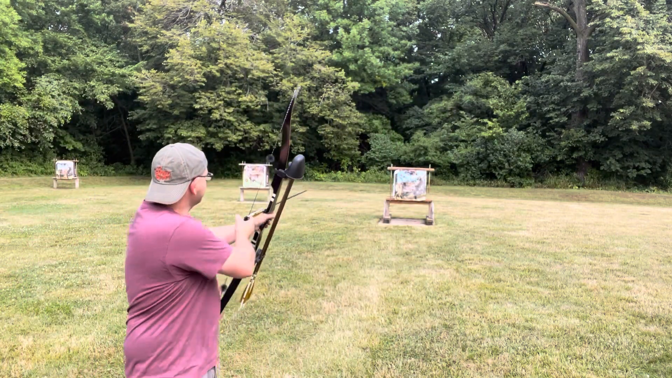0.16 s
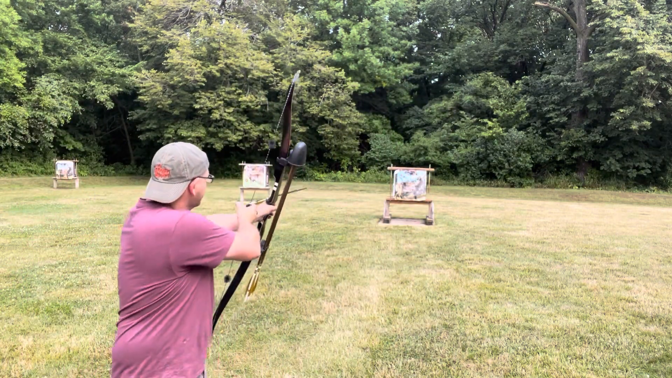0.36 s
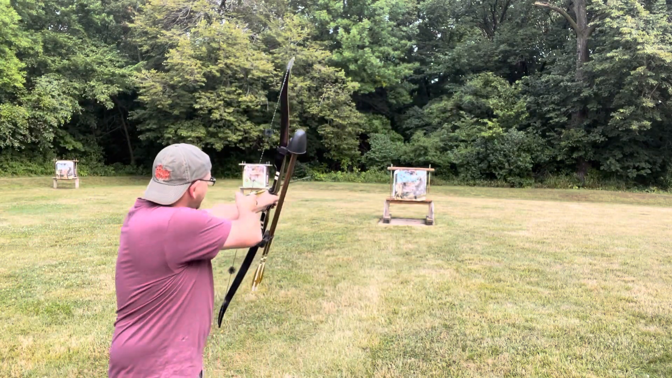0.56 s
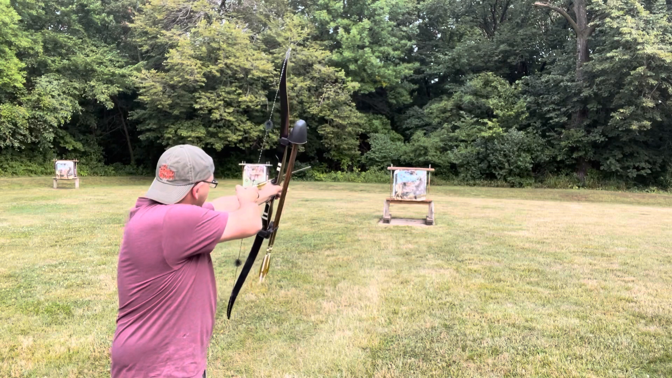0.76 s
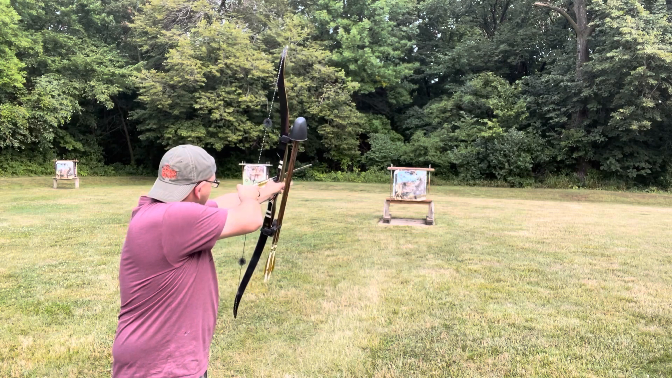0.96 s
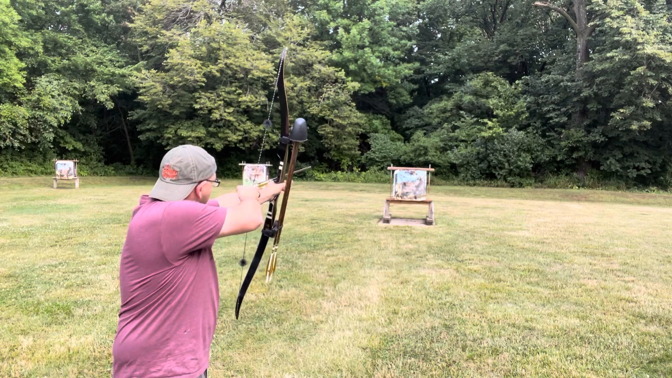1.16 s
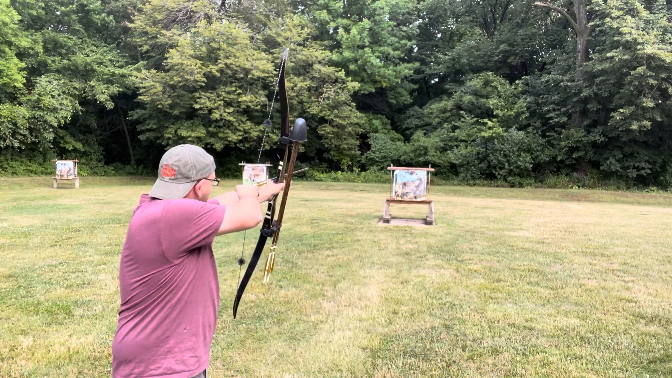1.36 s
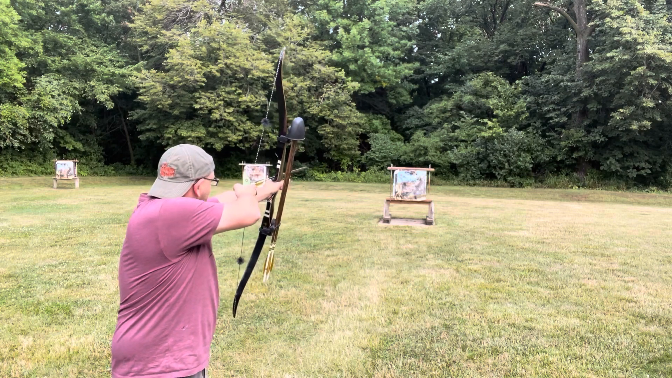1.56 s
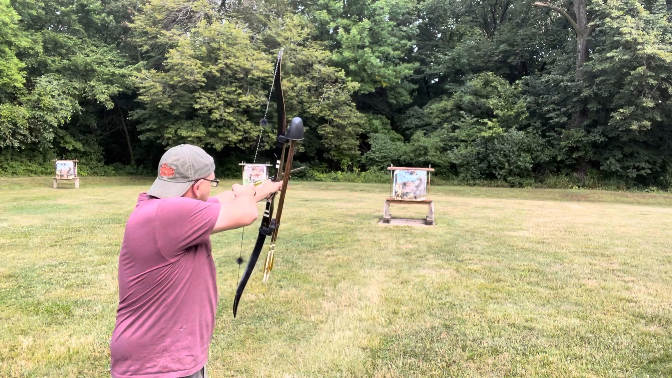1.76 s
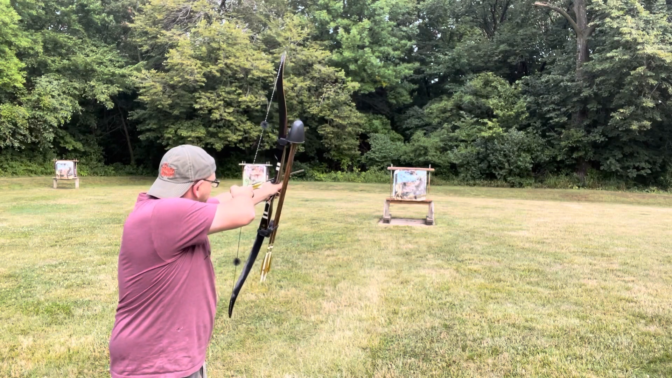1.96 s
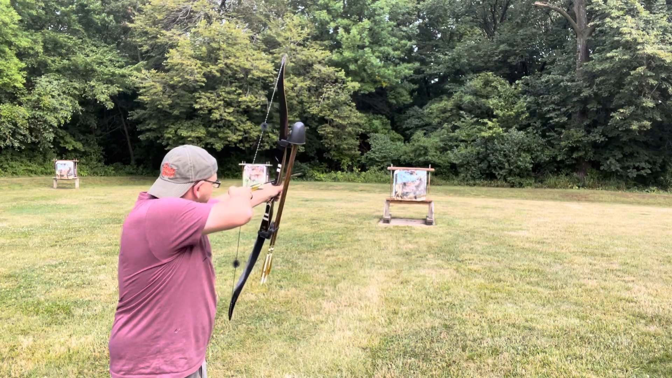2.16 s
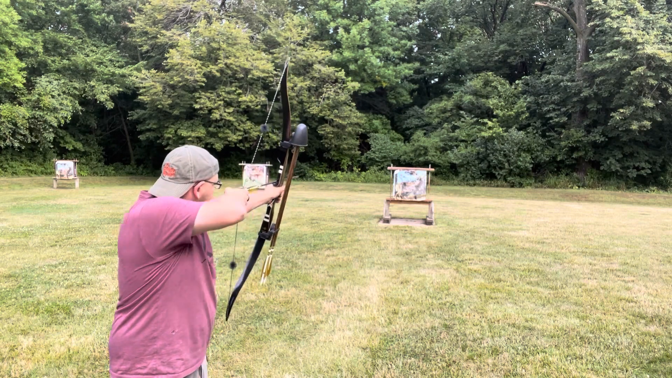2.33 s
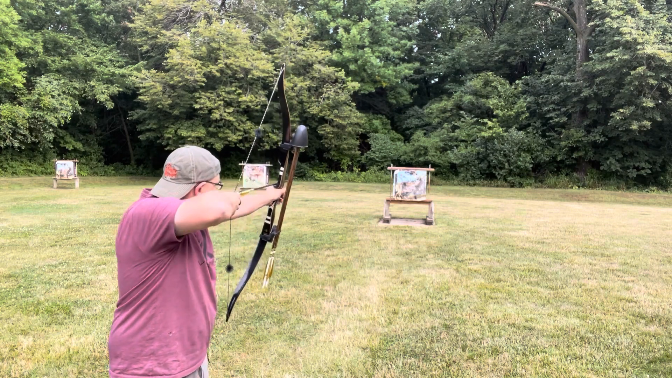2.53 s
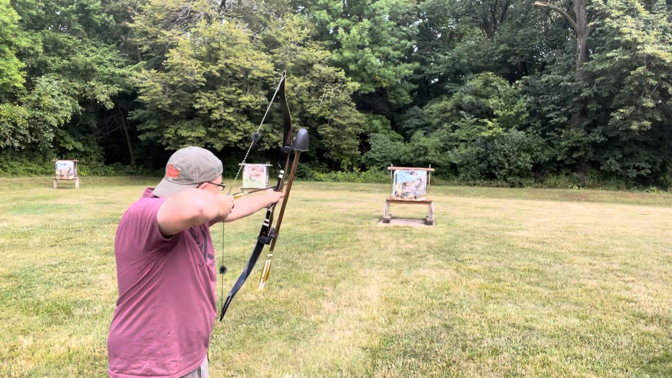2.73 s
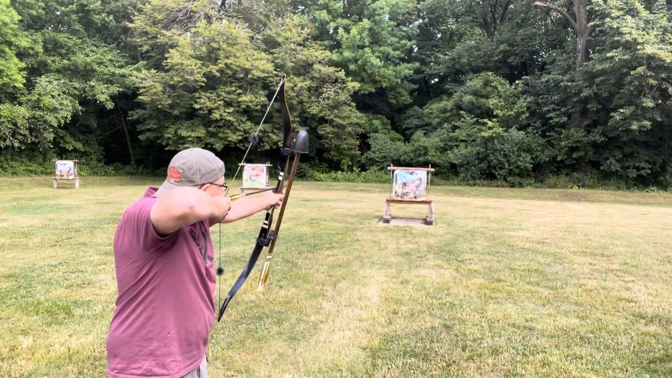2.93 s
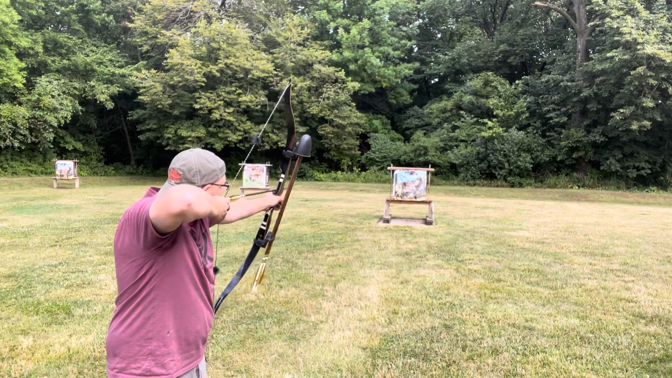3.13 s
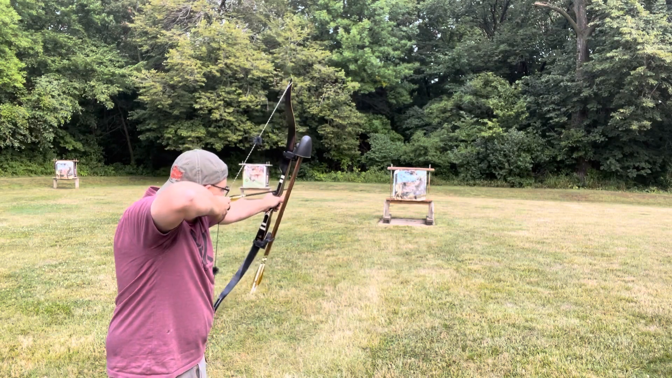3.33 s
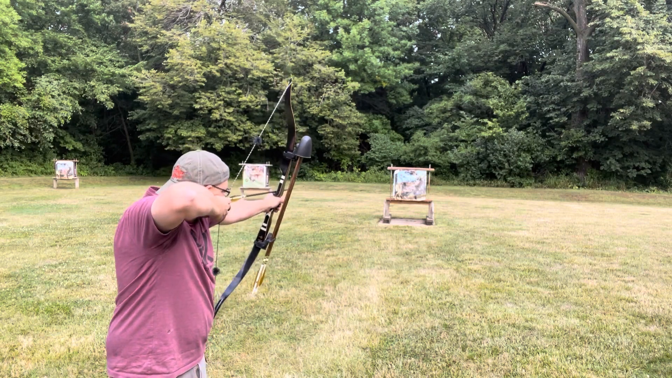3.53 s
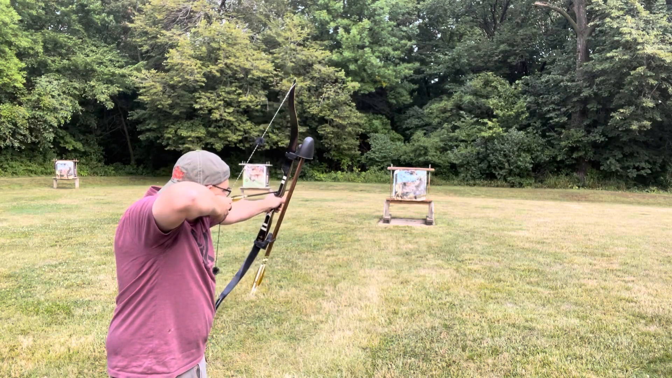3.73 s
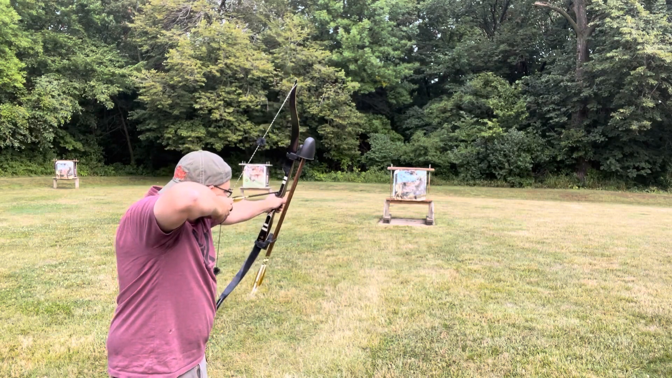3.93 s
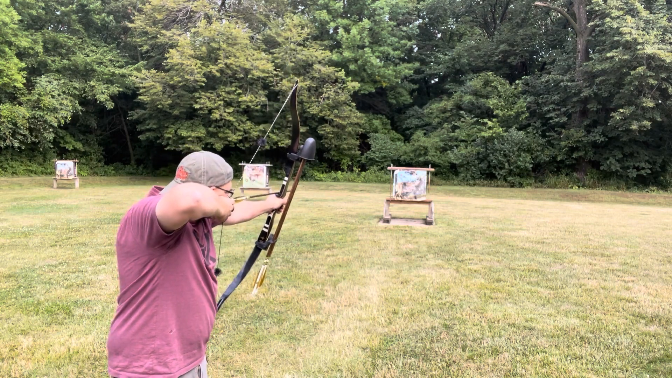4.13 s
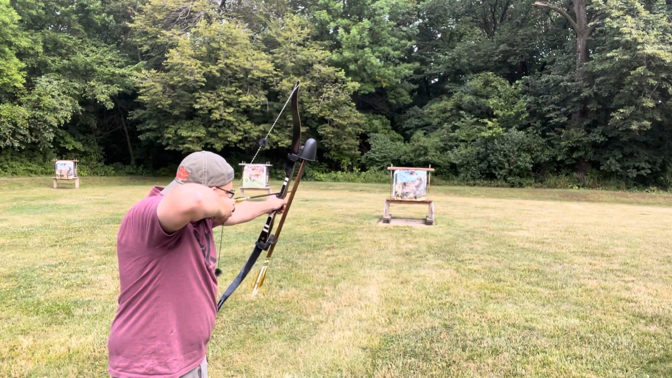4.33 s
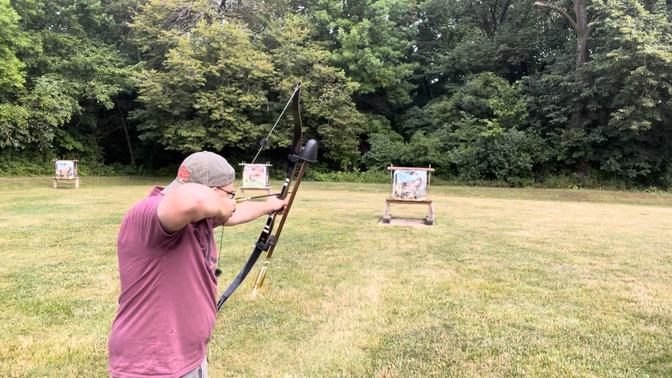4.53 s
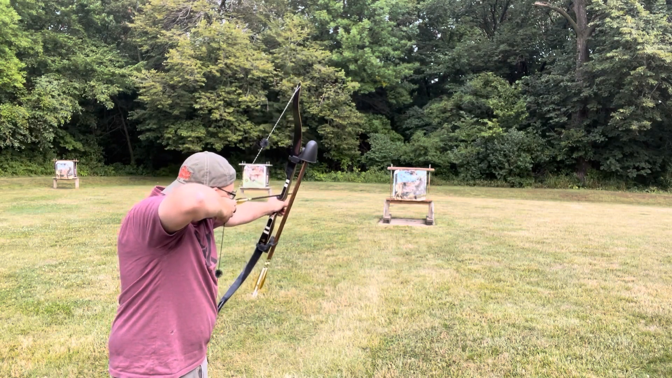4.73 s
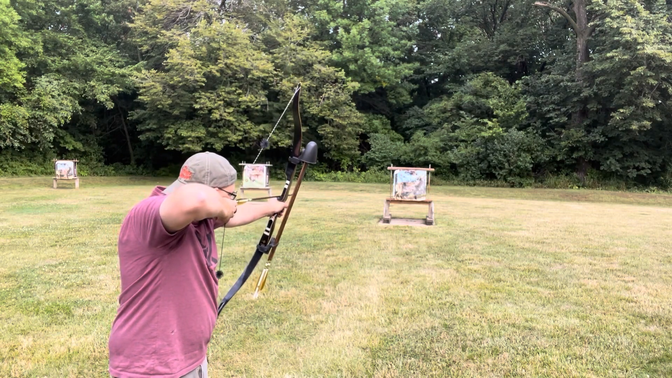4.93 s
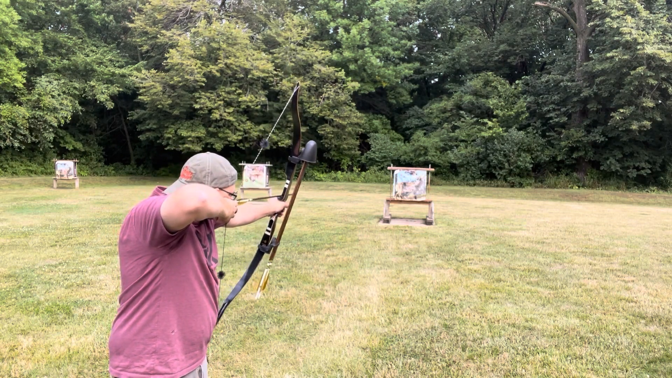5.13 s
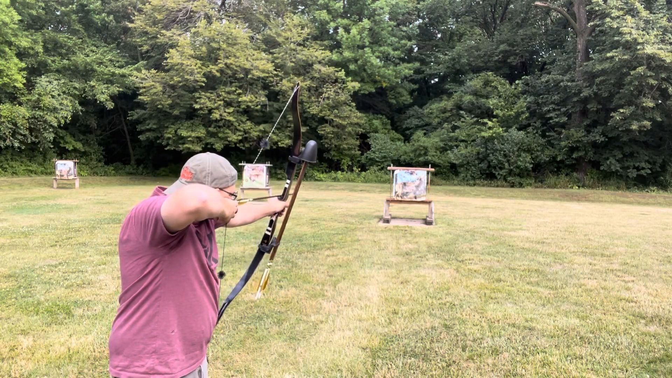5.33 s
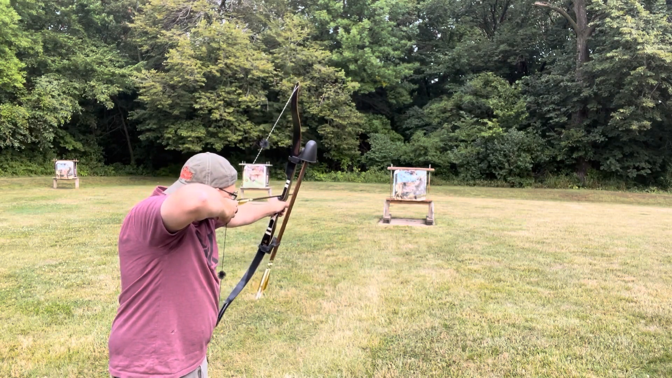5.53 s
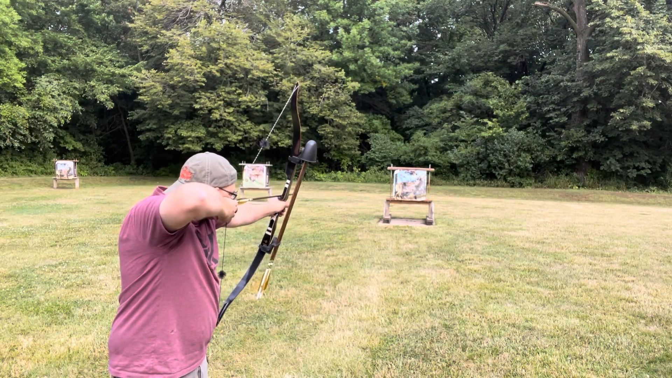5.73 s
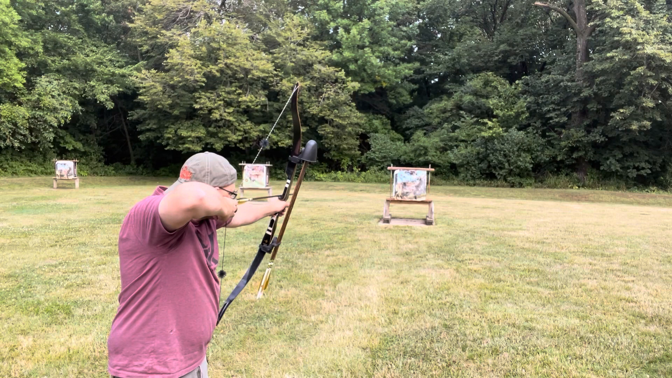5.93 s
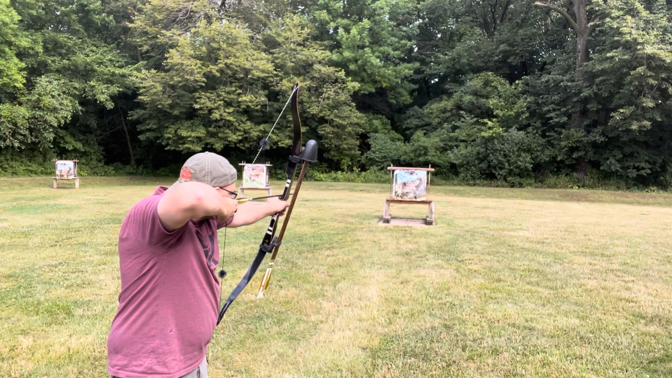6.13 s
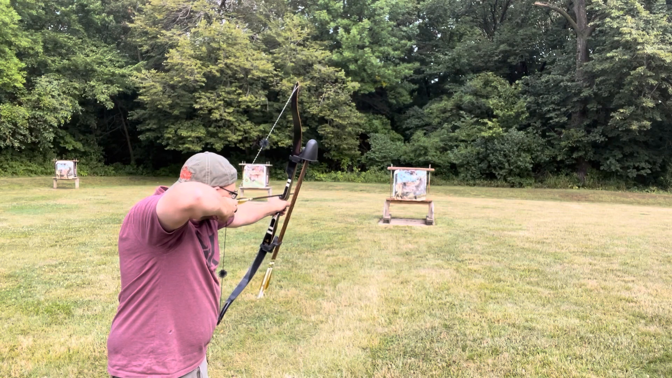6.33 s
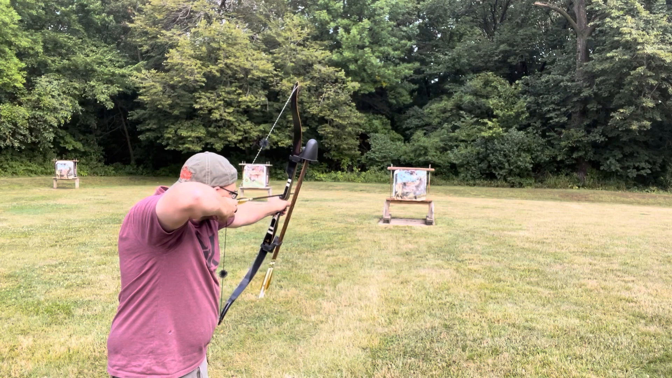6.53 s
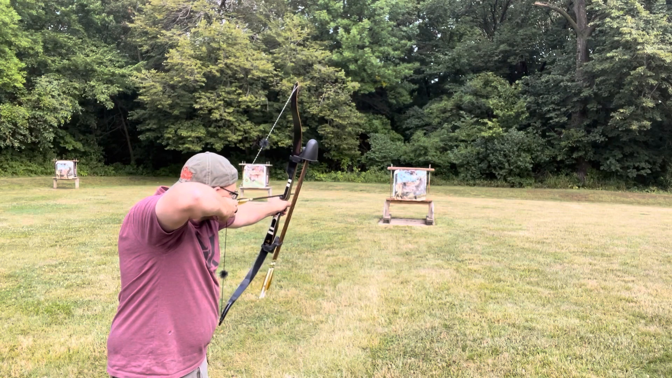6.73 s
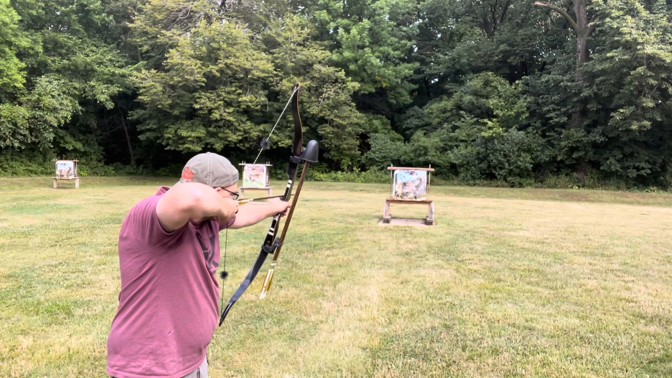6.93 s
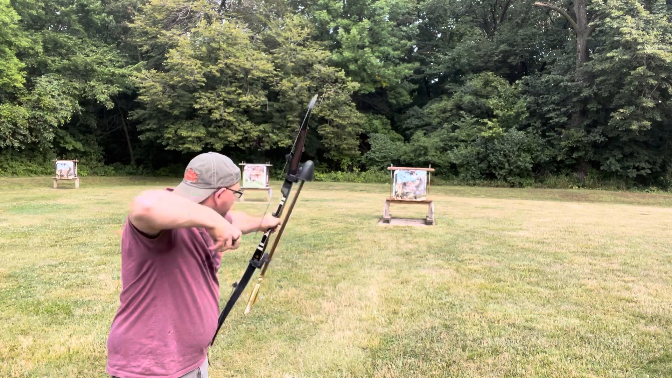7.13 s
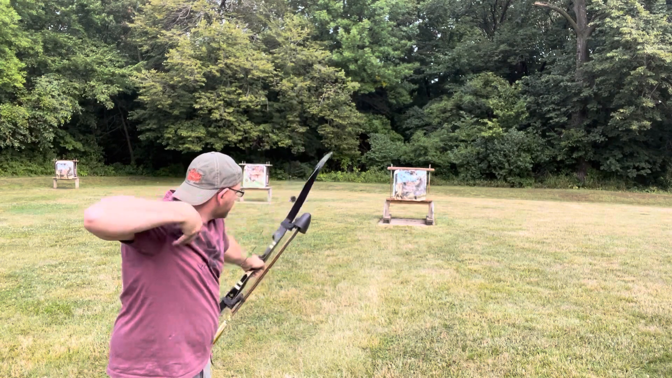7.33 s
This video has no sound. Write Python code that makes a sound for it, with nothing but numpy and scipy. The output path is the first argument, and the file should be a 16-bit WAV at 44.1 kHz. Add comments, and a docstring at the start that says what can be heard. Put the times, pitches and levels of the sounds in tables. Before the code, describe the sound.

Insects shimmer, a near cricket chirps and birds chip on a grassy range until a bowstring cracks loose and an arrow smacks into a target.

```python
"""A grassy archery range at the edge of a wood: insects, a low motor drone, rumble, far traffic and air throughout.
Clothes rustle and birds chip at once; a near cricket, trills, buzzy calls and whistles follow, mostly as sine waves.
The background is louder from 1.75 to 4.2 s. At 4.5 s a far engine whines, then sags in pitch. At 7 s the bowstring
is loosed: noise cracks ring the limbs, a grainy rattle dies away, slow thuds and a blur from the trees follow.
At 7.3 s the arrow smacks into the target: a falling snap, short ringing tones, noise and late pings."""
import sys
import numpy as np
from scipy import signal
from scipy.fft import rfft, irfft
from scipy.io import wavfile

SR = 44100
rng = np.random.default_rng(int(sys.argv[2]) if len(sys.argv) > 2 else 0)


def wrap_up_sound(samples):
    """Save the sound to the file named by the first command line argument, as 16-bit audio."""
    columns = np.atleast_2d(samples).T
    # keep every value between -1 and 1, then stretch to whole-number steps
    tamed = np.clip(columns, -1, 1)
    steps = np.round(tamed * 32767).astype(np.int16)
    wavfile.write(sys.argv[1], SR, steps)


N = 325458
HIT_S = 7.2968   # the arrow meets the target


def amp(db):
    """Gain of a dB value."""
    return 10 ** (np.asarray(db) / 20)


def rms_one(x):
    """Scale to an rms (average strength) of 1."""
    return x / np.sqrt(np.mean(x ** 2) + 1e-20)


def in_time(rows):
    """Columns of a curve, joined by straight lines, at every sample."""
    s, *columns = np.transpose(rows)
    return [np.interp(np.arange(N) / SR, s, c) for c in columns]


def add(out, s, x):
    """Mix x into out from second s."""
    at = round(s * SR)
    out[at:at + len(x)] += x[:N - at]


def drift(rate, size=N):
    """Smooth random wander with rms 1; a higher rate in Hz wanders faster."""
    r = np.exp(-2 * np.pi * rate / SR)
    wander = signal.lfilter([1], [1, -2 * r, r * r], rng.standard_normal(size + SR))
    return rms_one(wander[SR:])   # the first second lets the filter settle


def resonate(x, hz, width):
    """Two-pole resonance with gain 1 on top."""
    r = np.exp(-np.pi * width / SR)
    poles = [1, -2 * r * np.cos(2 * np.pi * hz / SR), r * r]
    return signal.lfilter([(1 - r * r) / 2, 0, (r * r - 1) / 2], poles, x)


def resonate_twice(x, hz, width):
    """The same resonance passed twice, for steeper sides."""
    return resonate(resonate(x, hz, width), hz, width)


def ring(x, hz, t60):
    """A unit click sets a sine ringing from height 1; it falls by 60 dB in t60 seconds."""
    r, w = amp(-60 / (t60 * SR)), 2 * np.pi * hz / SR
    return signal.lfilter([0, np.sin(w)], [1, -2 * r * np.cos(w), r * r], x + 1e-18)


def shaped(spectrum, size=N):
    """Noise with a given spectrum, rms 1."""
    hz, db = np.transpose(spectrum)
    grid = np.log(np.arange(size // 2 + 1) * SR / size + 1)
    gain = amp(np.interp(grid, np.log(hz), db))
    return rms_one(irfft(rfft(rng.standard_normal(size)) * gain, size))


def sine(hz):
    """Sine along a pitch track, rms 1 when steady."""
    return np.sqrt(2) * np.sin(2 * np.pi * np.cumsum(hz) / SR)


def span(length_s):
    """Share of an event gone by, 0 to 1, at every sample."""
    return np.linspace(0, 1, round(length_s * SR))


def hump(u, crest, edge_db, fade_s):
    """Gain that climbs in dB to its crest, sinks again and fades out at both ends."""
    crest = np.clip(crest, .01, .99)
    ends = np.clip(np.minimum(u, 1 - u) * len(u) / SR / fade_s, 0, 1)
    return amp(edge_db * np.maximum(1 - u / crest, (u - crest) / (1 - crest))) * ends


def drone():
    """A far motor: a low sine whose pitch and level waver."""
    # level of the motor before its waver: (t/s, level/dB)
    drone_level = [(0, -63), (.56, -59.5), (1.67, -60.5), (1.88, -56), (3.2, -52), (4.05, -54.5),
                   (4.3, -59.5), (5.3, -56), (6.1, -55), (6.5, -59), (7.38, -54.5)]
    db, = in_time(drone_level)
    return amp(db + 2.6 * drift(2.55)) * sine(87.5 + 3.44 * drift(4.78))


def rumble():
    """Low noise with a slowly changing level and a slight waver."""
    # relative strength of the noise by pitch: (f/Hz, level per Hz/dB)
    rumble_spectrum = [(20, -49), (35, -21), (50, 3), (70, 10), (120, 6), (170, -2.5), (260, -6), (380, -9),
                       (600, -44), (3000, -46), (11000, -42), (13600, -43), (14300, -58)]
    # level before the waver: (t/s, level/dB)
    rumble_level = [(0, -63.5), (1.7, -63), (1.87, -55.5), (2.9, -55.5), (4.1, -57), (4.25, -63.5),
                    (4.9, -63.5), (5.3, -60), (5.8, -61), (7.38, -63)]
    db, = in_time(rumble_level)
    return amp(db + 1.08 * drift(6)) * shaped(rumble_spectrum)


def traffic():
    """Far traffic: noise around the middle pitches, coming and going."""
    # relative strength of the noise by pitch: (f/Hz, level per Hz/dB)
    traffic_spectrum = [(250, -20), (420, 2.5), (550, 2.5), (700, 0.5), (900, -4), (1200, -14.5),
                        (2000, -45), (13600, -52), (14300, -66)]
    # level before the waver: (t/s, level/dB)
    traffic_level = [(0.0, -73.5), (0.37, -71.5), (1.59, -71), (1.8, -62.5), (2.02, -55.5), (2.89, -68.5),
                     (3.92, -68), (4.23, -75), (5.05, -76), (5.26, -69), (5.39, -70.5), (6.15, -77.5),
                     (6.87, -76.5), (6.97, -73.5)]
    db, = in_time(traffic_level)
    return amp(db + 2.2 * drift(5.9)) * shaped(traffic_spectrum)


def louder_stretch():
    """Share, 0 to 1, of a louder stretch from 1.75 to 4.2 s, which lifts the low chorus and the air."""
    t = np.arange(N) / SR
    start_s, end_s, rise_s, fall_s = 1.75, 4.2, .15, .15
    return np.clip(np.minimum((t - start_s) / rise_s, (end_s - t) / fall_s), 0, 1)


def chorus(wings, flicker_db):
    """Countless far insects blur into noise in their wing resonances."""
    bands = []
    for hz, width, db in wings:
        band = rms_one(resonate_twice(rng.standard_normal(N), hz, width))
        bands.append(amp(db + flicker_db * drift(25)) * band)
    return rms_one(sum(bands))


def insects():
    """A low chorus, louder in that stretch, and a high chorus that sings lower at first, then climbs."""
    # wing resonances of the low insects: (f/Hz, width of each pass/Hz, relative level/dB)
    low_wings = [(4820, 340, -3), (5172, 300, 0.5), (5470, 580, 0)]
    # wing resonances of the high insects: (f/Hz, width of each pass/Hz, relative level/dB)
    high_wings = [(6590, 760, -3), (7200, 370, 1.5), (7610, 430, -1.5)]
    # level of the high chorus: (t/s, level/dB)
    high_level = [(0.0, -74.5), (0.7, -81.5), (1.1, -81), (1.92, -72.5), (3.98, -73.5), (4.19, -77),
                  (4.46, -76.5), (5.38, -75), (5.71, -79.5), (6.97, -76.5)]
    low = amp(-71.5 + 2 * louder_stretch()) * chorus(low_wings, flicker_db=0.9)
    early_wings = [(0.98 * hz, width, db) for hz, width, db in high_wings]
    # crossfade from the lower singing to the higher, 1.2 to 1.6 s
    risen = np.interp(np.arange(N) / SR, (1.2, 1.6), [0, np.pi / 2])
    early = np.cos(risen) * chorus(early_wings, flicker_db=3.0)
    late = np.sin(risen) * chorus(high_wings, flicker_db=1.5)
    high_db, = in_time(high_level)
    return low + amp(high_db) * (early + late)


def air():
    """Soft hiss of the open air, louder from 1.75 to 4.2 s, mostly below 11 kHz."""
    # relative strength of the noise by pitch: (f/Hz, level per Hz/dB)
    air_spectrum = [(500, 16), (1500, 10.5), (3000, 6.5), (6000, 12), (8500, -10), (10500, 1), (13500, -19),
                    (14000, -25), (14600, -30), (17000, -46)]
    hiss = shaped(air_spectrum)
    below_11k = signal.sosfilt(signal.butter(2, 11000, fs=SR, output="sos"), hiss)
    hiss = hiss + (amp(2 * louder_stretch()) - 1) * below_11k
    return amp(-80 + 0.82 * drift(1)) * hiss


def rustles():
    """Cloth sliding over cloth: noise in a few body resonances plus a bright swish."""
    # rustles: (t/s, crest t/s, end t/s, body level/dB, swish level/dB, level of the ends below the crest/dB)
    rustle_rows = [(0, .005, .09, -70.5, -75, -12), (.36, .46, .5, -79, -78, -6),
                   (1.746, 1.94, 2.2, -68, -82, -12), (2.177, 2.298, 2.39, -67.5, -87, -12),
                   (2.356, 2.37, 2.53, -69, -73.5, -9), (2.5, 2.6, 2.76, -77.5, -84, -10)]
    # resonances of the cloth: (f/Hz, width of each pass/Hz, relative level/dB)
    cloth = [(1060, 690, 3.5), (1705, 260, 1), (2140, 430, 1), (3700, 1700, 0.5)]
    body = np.zeros(N)
    for hz, width, db in cloth:
        band = rms_one(resonate_twice(rng.standard_normal(N), hz, width))
        body += amp(db + 1.4 * drift(16.0)) * band
    body = rms_one(body)
    swish_band = signal.butter(4, [2500, 11500], "band", fs=SR, output="sos")
    swish = signal.sosfilt(swish_band, rng.standard_normal(N))
    swish = rms_one(swish * amp(1.1 * drift(60)))
    out = np.zeros(N)
    for s, crest_s, end_s, body_db, swish_db, edge_db in rustle_rows:
        at, u = round(s * SR), span(end_s - s)
        part = slice(at, at + len(u))
        cloth_sound = amp(body_db) * body[part] + amp(swish_db) * swish[part]
        add(out, s, hump(u, (crest_s - s) / (end_s - s), edge_db, fade_s=0.0035) * cloth_sound)
    return out


def chips():
    """Short bird chips: gliding sines that rise quickly and die away."""
    # chips: (t/s, level before rise and decay/dB, f/Hz, time to fall 60 dB/s, glide/Hz per ms)
    chip_rows = [(.004, -59, 4430, 0.2, 1.5), (.066, -56, 5600, 0.025, -45), (1.575, -56.5, 7560, 0.12, 6),
                 (1.58, -59, 6580, 0.07, -8), (1.922, -69, 11000, .04, -2), (1.965, -60, 6550, 0.13, 4.5),
                 (2.164, -51, 4450, 0.096, 0), (2.361, -44, 5300, 0.024, 4), (2.418, -60, 5300, 0.045, 0),
                 (4.285, -58, 6240, 0.068, -11), (4.355, -53, 5100, 0.11, -2.5),
                 (4.38, -56, 4920, 0.036, -69), (4.385, -58.5, 4000, .04, 0)]
    out = np.zeros(N)
    for s, db, hz, t60, glide in chip_rows:
        t = np.arange(round(t60 * SR)) / SR
        level = amp(db - 60 * t / t60) * np.minimum(t / (0.15 * t60), 1)
        add(out, s, level * sine(hz + 1000 * glide * t + 90 * drift(150, size=len(t))))
    return out


def cricket():
    """Each wing stroke arches up and falls further down; a weak return stroke follows."""
    # bouts of chirps: (first chirp t/s, last chirp t/s, top of the arch f/Hz,
    # first level/dB, last level/dB, roughness/0-1)
    bouts = [(0.123, 0.891, 7100, -82, -71.5, 0.8), (0.961, 1.278, 7100, -80, -74, 0.75),
             (1.335, 1.508, 7350, -71, -70, .6), (1.567, 1.8, 7380, -70, -74, 0.2),
             (4.159, 5.514, 7500, -69.5, -69.5, 0.07), (5.619, 5.87, 7280, -70.5, -79, 0.1),
             (5.9446, 6.955, 7490, -69.5, -68.5, 0.07), (7.148, 7.342, 7600, -67.5, -69, 0)]
    chirp_gap_s, jitter_s, spread_db, return_db = .063, .002, 0.5, -7
    out, u = np.zeros(N), np.linspace(-1, 1, round(0.028 * SR))
    leaves = drift(240, size=N + SR)   # the grass roughens the stroke on its way
    for first, last, hz, first_db, last_db, blur in bouts:
        stroke = np.cos(np.pi / 2 * u) * sine(hz * (1 - 0.073 * (u + 0.21) ** 2))
        back = amp(return_db) * np.cos(np.pi / 2 * u) * sine(.945 * hz + 120 * u)
        for share in np.linspace(0, 1, round((last - first) / chirp_gap_s) + 1):
            late, loud = rng.standard_normal(2)
            s = first + share * (last - first) + jitter_s * late
            gain = amp(first_db + share * (last_db - first_db) + spread_db * loud)
            gain = gain * (1 - blur + blur * leaves[round(s * SR):][:len(u)])
            add(out, s - .006, gain * stroke)
            add(out, s + 0.032, gain * back)
    return out


def trills():
    """Bird trills: a sine falls in pitch over and over, and the wood rings on after it."""
    # trills: (t/s, length/s, level/dB, slurs per s, opens this far below/Hz,
    # time scale of the climb from there/s, blur from the wood/dB)
    trill_rows = [(0.244, 0.15, -65.5, 65, 100, 0.011, -4), (2.454, 0.15, -74, 62, 700, .025, 2),
                  (4.661, 0.158, -65, 60.5, 500, .01, -4)]
    start_db, crest, hold, fade_db, attack_s = -5, 0.3, 0.86, -4, 0.0051   # crest and hold: share of length
    top_hz, end_hz, fall, sag_hz, tail_db = 4200, 2800, .4, 148.4, -8.5   # fall: share of a slur
    wood_t60_s = .38
    out = np.zeros(N)
    for s, length_s, db, per_s, scoop_hz, scoop_s, wood_db in trill_rows:
        u = span(length_s)
        size = len(u)
        rising_db = start_db * np.maximum(1 - u / crest, 0)
        fading_db = fade_db * np.maximum(u - hold, 0) / (1 - hold)
        level = amp(db + rising_db + fading_db) * np.minimum(u * length_s / attack_s, 1)
        # place within the current slur, 0 to 1, at a slightly uneven pace
        cycle = (.69 + np.cumsum(per_s * (1 + .015 * drift(15, size=size))) / SR) % 1
        # every slur falls; the trill climbs from its scoop and sinks as it goes
        base_hz = end_hz - sag_hz * u - scoop_hz * np.exp(-u * length_s / scoop_s)
        slur_hz = base_hz + 80 * drift(34.0, size=size) + (top_hz - end_hz) * np.exp(-cycle / fall)
        rough = amp(1.6 * drift(33, size=size)) * (1 + 0.17 * drift(270, size=size))
        # every slur is loudest near its start
        pulse = np.exp(-((cycle - .17) / 0.12) ** 2) + amp(tail_db) * np.sin(np.pi * cycle)
        trill = level * rough * pulse * sine(slur_hz)
        wood = rng.standard_normal(SR // 3) * amp(-60 * np.arange(SR // 3) / SR / wood_t60_s)
        wood /= np.sqrt(np.sum(wood ** 2))
        add(out, s, trill)
        add(out, s, amp(wood_db) * signal.fftconvolve(trill, wood))
    return out


def grip_ticks():
    """Small ticks from the bow grip: very short rings."""
    # ticks: (t/s, level before the decay/dB)
    tick_rows = [(0.5064, -54), (0.5294, -77)]
    out = np.zeros(N)
    for s, db in tick_rows:
        add(out, s, amp(db) * ring(signal.unit_impulse(400), 2800, 0.003))
    return out


def rough_bands():
    """Buzzy calls, and one rough band of rustling cloth at 2.35 s: random loudness blurs each sine's pitch."""
    # buzzy calls, and the cloth band at 2.351 s: (t/s, length/s, first f/Hz, last f/Hz,
    # rate of the roughness/Hz, clear share/0-1, loudest at this share of the length,
    # level/dB, level of the ends below the crest/dB)
    band_rows = [(1.097, 0.084, 3620, 3580, 80, 0.3, .3, -83, -4),
                 (1.24, 0.12, 3620, 3480, 80, 0.32, .5, -77.5, -7),
                 (1.439, 0.13, 3490, 3630, 80, 0.4, .5, -80.5, -4),
                 (1.779, 0.36, 3660, 3500, 250, 0.26, 0.33, -80, -1),
                 (2.144, 0.14, 4230, 4470, 350, 0.2, .15, -72.5, 0),
                 (2.351, 0.13, 2034, 2053, 200, 0.1, .2, -68.5, -7),
                 (3.36, .04, 3750, 3700, 100, .3, .4, -87, -4),
                 (3.86, 0.26, 3600, 3720, 250, 0.14, .35, -75.5, -12),
                 (4.57, 0.065, 3530, 3100, 300, 0.2, .5, -81, -1.5),
                 (5.578, .06, 3450, 3450, 150, 0.3, .3, -86, -4),
                 (6.567, 0.37, 4090, 4060, 90, 0.5, 0.67, -84, -2),
                 (6.573, 0.2, 6200, 6120, 200, 0.3, 0.7, -69, -3),
                 (6.749, 0.22, 6080, 6250, 200, 0.3, .1, -71.5, -3),
                 (6.66, .29, 6420, 6440, 150, .2, .3, -75, -7),
                 (.75, 0.17, 6600, 6500, 150, .2, .3, -76, -6),
                 (6.57, 0.37, 8180, 8100, 250, 0.3, .3, -81, -4)]
    out = np.zeros(N)
    for s, length_s, first, last, spread_hz, clear, crest, db, edge_db in band_rows:
        u = span(length_s)
        rough = clear + (1 - clear) * drift(spread_hz, size=len(u))
        tone = sine(first + (last - first) * u)
        add(out, s, amp(db) * hump(u, crest, edge_db, fade_s=0.0065) * rough * tone)
    return out


def whistles():
    """Whistled bird notes: sines bent through three pitches."""
    # notes: (t/s, length/s, first f/Hz, middle f/Hz, last f/Hz, level/dB)
    whistle_rows = [(2.81, 0.021, 2940, 2760, 2800, -75.5), (2.828, 0.027, 3560, 3870, 3260, -73.5),
                    (2.854, .012, 2949, 2936, 2930, -76), (2.889, 0.048, 2570, 2540, 2320, -73.5),
                    (2.957, .042, 2320, 2570, 3040, -73), (3.015, 0.076, 3540, 3490, 3440, -79),
                    (3.077, 0.024, 3450, 3750, 4250, -79), (3.952, 0.032, 2880, 2480, 3250, -79),
                    (4.035, 0.034, 3350, 2980, 2370, -74), (4.076, 0.013, 2420, 2730, 3150, -68),
                    (4.085, 0.0266, 3170, 2840, 2350, -70.5), (4.183, .008, 2450, 2800, 3200, -80),
                    (4.217, 0.02, 2780, 2650, 2550, -82), (4.268, .032, 2460, 2640, 2850, -85)]
    out = np.zeros(N)
    for s, length_s, first, middle, last, db in whistle_rows:
        u = span(length_s)
        bend = 4 * u * (1 - u) * (middle - (first + last) / 2)
        hz = first + (last - first) * u + bend
        add(out, s, amp(db) * hump(u, crest=0.88, edge_db=-4.5, fade_s=.003) * sine(hz))
    return out


def climbing_call():
    """A long buzzy call, a roughened sine, that dips, climbs and fades."""
    # path of the call: (t/s, f/Hz, level/dB)
    climb = [(3.345, 3570, -88), (3.37, 3530, -82), (3.43, 3320, -81), (3.55, 3380, -84), (3.7, 3510, -76),
             (3.83, 3770, -80), (3.92, 4000, -74), (4.05, 4120, -75), (4.2, 4130, -78), (4.26, 4150, -89),
             (4.31, 4140, -82), (4.35, 4130, -92)]
    rough_hz, clear = 160, .12   # rate of the roughness, clear share
    hz, db = in_time(climb)
    t = np.arange(N) / SR
    sounding = (t > climb[0][0]) * (t < climb[-1][0])
    return sounding * amp(db) * (clear + (1 - clear) * drift(rough_hz)) * sine(hz)


def birds_and_cloth_band():
    """The birds of the wood and the rough cloth band, with 40 weak, scattered echoes from the leaves."""
    calls = chips() + trills() + rough_bands() + whistles() + climbing_call()
    echoes = np.zeros(round(.12 * SR))
    echoes[rng.integers(200, len(echoes), 40)] = rng.standard_normal(40)
    echoes *= amp(-19.5 - 200 * np.arange(len(echoes)) / SR)
    return calls + signal.fftconvolve(calls, echoes)[:N]


def engine():
    """A far engine whine, a wavering sine, that holds its pitch and then sags as it passes."""
    start_s, peak_s, end_s = 4.48, 5.4, 6.27
    hold_hz, low_hz, sag_s = 441, 270, .55   # sinks toward low_hz
    out = np.zeros(N)
    t = np.arange(start_s, end_s, 1 / SR)
    db = -70 + np.interp(t, [start_s, peak_s, end_s], [-13.5, 0, -10.5])
    hz = low_hz + (hold_hz - low_hz) * np.exp(-np.maximum(t - peak_s, 0) / sag_s)
    whine = sine(hz + 3 * drift(8, size=len(t)))
    fades = signal.windows.tukey(len(t), .06)
    add(out, start_s, amp(db + 2.0 * drift(10, size=len(t))) * fades * whine)
    return out


def rattle():
    """Loose string and quiver hiss from just before the first slap: grainy noise that holds and dies away."""
    start_s, rise_s, hold_s = 6.998, 0.013, 0.048
    out = np.zeros(N)
    t = np.arange(N - round(start_s * SR)) / SR
    falling_s = np.maximum(t - hold_s, 0)
    grain = rng.standard_normal((2, len(t))) * amp(2.8 * drift(200, size=len(t)))
    mid = signal.sosfilt(signal.butter(1, [300, 2800], "band", fs=SR, output="sos"), grain[0])
    treble = signal.sosfilt(signal.butter(2, 5500, "high", fs=SR, output="sos"), grain[1])
    # each falls by 60 dB in the time it is divided by
    mid = amp(-39.5 - 60 * falling_s / 0.21) * rms_one(mid)
    treble = amp(-53 - 60 * falling_s / 0.27) * rms_one(treble)
    add(out, start_s, np.minimum(t / rise_s, 1) ** 2 * (mid + treble))
    return out


def slaps():
    """String slaps on the limbs: each is a short noise crack that also sets the limbs ringing."""
    # slaps: (t/s, peak level/dB, brightness f/Hz, width of each pass/Hz,
    # push on the limbs' ringing/dB, push on their bending/dB)
    slap_rows = [(7.0074, -28, 3500, 12000, -3.5, -22), (7.0101, -22, 5000, 6000, -2.5, -22),
                 (7.0137, -23.5, 560, 710, 3.5, -22), (7.0217, -21, 3080, 900, -5.5, -22),
                 (7.0262, -16, 4460, 8800, -3.5, -22), (7.03, -21, 1870, 2000, -8, -20),
                 (7.0424, -21.5, 4300, 9000, -6, -5), (7.047, -37, 1500, 2500, -11, -7),
                 (7.054, -33, 6000, 12000, -7, 10), (7.0566, -29, 1200, 2000, -11, -13),
                 (7.0584, -28.5, 4970, 9000, -0.5, -13), (7.0604, -32.5, 800, 1500, -4, -3),
                 (7.0725, -37, 6000, 14000, -14, -12), (7.081, -45, 7000, 14000, -20, -18),
                 (7.088, -44, 8960, 11940, -15, -23), (7.102, -44, 8000, 16000, -19, -16),
                 (7.118, -47, 6000, 14000, -24, -29)]
    # ringing tones of the limbs: (f/Hz, level for a push of 0 dB/dB, time to fall 60 dB/s)
    limb_modes = [(257, -52, 0.25), (268, -56, .25), (345, -58, .1), (403, -45, 0.027), (485, -46, 0.056),
                  (548, -42, 0.16), (790, -35, 0.014), (915, -49, 0.056), (1080, -49, 0.033),
                  (1310, -39.5, 0.086), (1540, -52, 0.041), (1740, -47, 0.092), (2250, -44, 0.029)]
    buzz_db, buzz_t60_s = -7, 0.036   # the string buzzes on after each slap
    bending_below_hz = 350
    out, pushes = np.zeros(N), np.zeros((2, SR // 2))
    start_s = slap_rows[0][0]
    after = np.arange(1500) / SR
    for s, db, hz, spread_hz, *limb_db in slap_rows:
        decay = amp(-60 * after / 0.0048) + amp(buzz_db - 60 * after / buzz_t60_s)
        crack = rng.standard_normal(len(after)) * decay
        crack[8] += 5.5   # the contact itself is one sharp click
        crack = resonate_twice(crack, hz, spread_hz)
        add(out, s - .0004, amp(db) * crack / np.abs(crack).max())
        pushes[:, round(s * SR) - round(start_s * SR)] = amp(limb_db)
    for hz, db, t60 in limb_modes:
        add(out, start_s, amp(db) * ring(pushes[int(hz < bending_below_hz)], hz, t60))
    return out


def thuds():
    """Slow heaves of the limbs and the target stand: low swings that swell and die within a few cycles."""
    # heaves: (crest t/s, f/Hz, peak level/dB, time from crest to either end/s)
    thud_rows = [(7.036, 135, -36.5, 0.039), (7.071, 69, -41, 0.076), (7.101, 131, -43.5, 0.027),
                 (7.324, 103, -31.5, 0.035), (7.345, 160, -47, 0.068), (7.37, 117, -46, 0.045)]
    out = np.zeros(N)
    for s, hz, db, length_s in thud_rows:
        t = np.arange(-length_s, length_s, 1 / SR)
        swing = np.exp(-(4.9 * t / length_s) ** 2) * np.cos(2 * np.pi * hz * t)
        add(out, s - length_s, amp(db) * swing)
    return out


def tree_echo():
    """The tree line throws the release back as a blur of noise that rises softly and dies."""
    start_s, rise_s, t60_s = 7.125, .06, 1.0
    out = np.zeros(N)
    t = np.arange(N - round(start_s * SR)) / SR
    blur = rms_one(resonate(rng.standard_normal(len(t)), 3000, 3500))
    blur = blur * amp(2.0 * drift(40, size=len(t)))
    add(out, start_s, amp(-66 - 60 * t / t60_s) * np.minimum(t / rise_s, 1) * blur)
    return out


def arrow_rush():
    """The flying arrow's rush of noise, just before the hit."""
    out, u = np.zeros(N), span(0.014)
    rush = rms_one(resonate_twice(rng.standard_normal(len(u)), 900, 900))
    add(out, HIT_S - len(u) / SR, amp(-60) * np.sin(np.pi * u ** 1.8) * rush)
    return out


def snap(t):
    """The impact runs down the shaft, treble first: a sine that falls steeply in pitch."""
    top_hz, end_hz, fall_ms = 7793, 584, 1.5
    rise_ms, hold_ms, t60_ms = 0.7, 3.66, 2.3
    ms = t * 1000
    hz = end_hz + (top_hz - end_hz) * np.exp(-(ms / fall_ms) ** 1.49)
    level = amp(-18 - 60 * np.maximum(ms - hold_ms, 0) / t60_ms) * np.minimum(ms / rise_ms, 1) ** 2
    return level * np.sin(2 * np.pi * np.cumsum(hz) / SR)


def target_hit():
    """The arrow's snap, the target's ringing tones, and crack, foam and stuffing noise."""
    # ringing tones of the target: (f/Hz, level before the decay/dB, time to fall 60 dB/s)
    target_modes = [(207, -33, 0.12), (300, -30.5, 0.075), (392, -36, 0.05), (482, -35, 0.057),
                    (559, -29.5, 0.064), (632, -12.5, 0.013), (930, -38, 0.031), (1295, -23.5, 0.013),
                    (1950, -35, 0.02), (3040, -14, 0.0088), (4500, -26, 0.012), (5850, -17, 0.01),
                    (7550, -27.5, 0.012), (14300, -31, .004)]
    out = np.zeros(N)
    t = np.arange(N - round(HIT_S * SR)) / SR
    for hz, db, t60 in target_modes:
        lag_s = .0005 + 0.63 / hz   # low tones start later
        add(out, HIT_S + lag_s, amp(db) * ring(signal.unit_impulse(len(t)), hz, t60))
    white = rng.standard_normal((2, len(t))) * np.minimum(t / .0008, 1)
    crack = amp(-32.0 - 60 * t / 0.0073) * white[0]
    puff = amp(-34.0 - 60 * t / 0.026) * signal.lfilter([.4], [1, -.6], white[1])   # foam
    thump = amp(-21.0 - 60 * t / 0.06) * resonate(white[0], 680, 600)   # the stuffing shakes
    tail = amp(-58.0 - 60 * t / 1.1) * resonate(white[1], 1400, 2500)   # the tree line throws back a blur
    add(out, HIT_S, snap(t) + crack + puff + thump + tail)
    return out


def quivers():
    """Shaft pings and knocks after the hit: tiny noise taps through a resonance."""
    # pings and knocks: (t/s, peak level/dB, f/Hz, width of each pass/Hz)
    quiver_rows = [(7.3116, -35.5, 3900, 700), (7.3123, -44, 1300, 1200), (7.3165, -44, 3900, 900),
                   (7.3175, -37, 450, 500), (7.3215, -55, 5200, 800), (7.339, -54, 3650, 700),
                   (7.34, -51, 950, 600), (7.345, -52, 3600, 900), (7.349, -54, 800, 500),
                   (7.3745, -47, 4000, 3500)]
    out, t = np.zeros(N), np.arange(600) / SR
    for s, db, hz, spread_hz in quiver_rows:
        tap = rng.standard_normal(600) * amp(-60 * t / .005)
        ping = resonate_twice(tap, hz, spread_hz)
        add(out, s, amp(db) * ping / np.abs(ping).max())
    return out


def scene():
    """Everything at one microphone."""
    background = drone() + rumble() + traffic() + insects() + air()
    near_sounds = birds_and_cloth_band() + cricket() + rustles() + grip_ticks()
    bow = rattle() + slaps() + tree_echo()
    arrow = arrow_rush() + target_hit() + quivers()
    return (background + near_sounds + engine() + bow + thuds() + arrow)[None]


def record(dry):
    """The bass is rolled off below 44 Hz; the top is cut, 70 dB down from 16200 Hz up."""
    low_cut = signal.sosfilt(signal.butter(6, 44, "high", fs=SR, output="sos"), dry)
    return signal.sosfilt(signal.cheby2(14, 70, 16200, fs=SR, output="sos"), low_cut)


dry = scene()
out = record(dry)
wrap_up_sound(out)
```